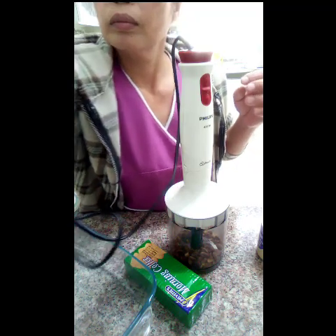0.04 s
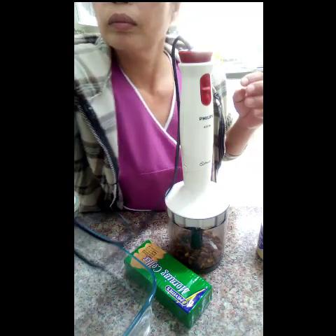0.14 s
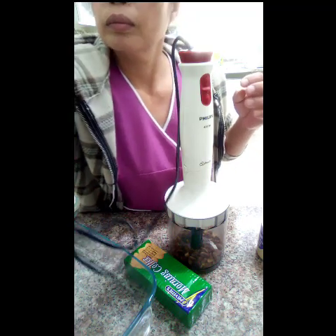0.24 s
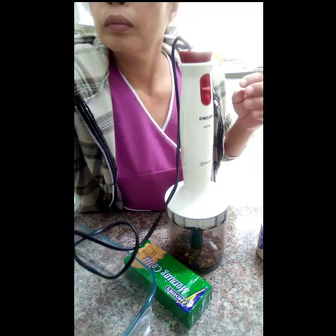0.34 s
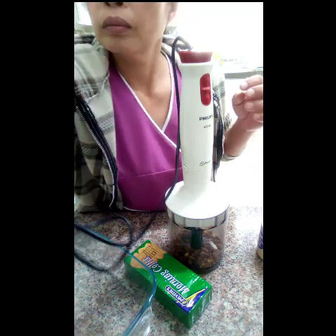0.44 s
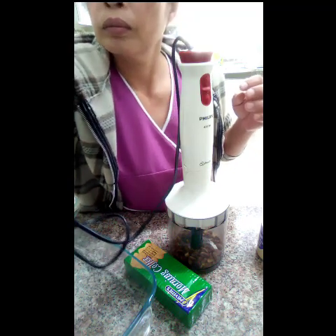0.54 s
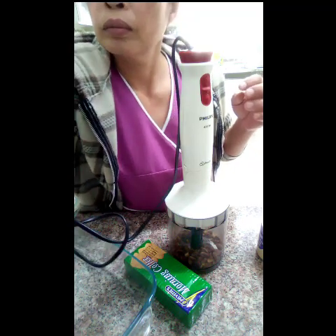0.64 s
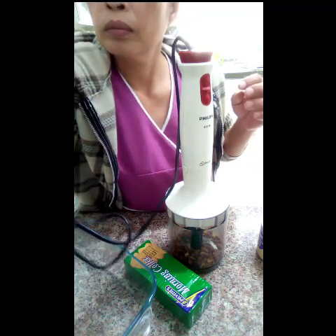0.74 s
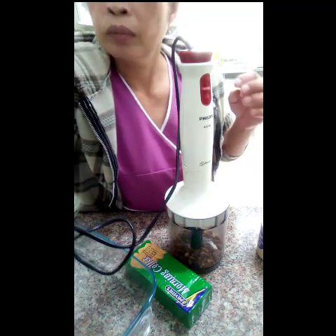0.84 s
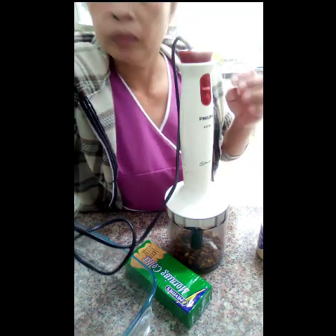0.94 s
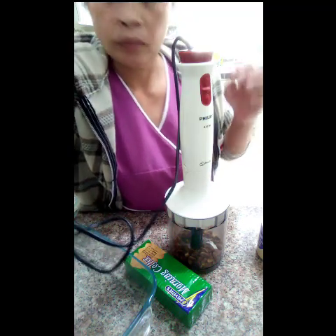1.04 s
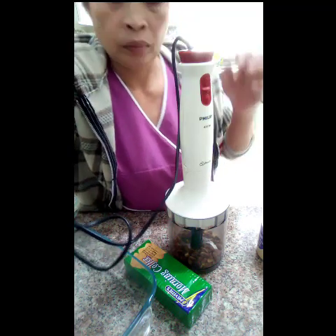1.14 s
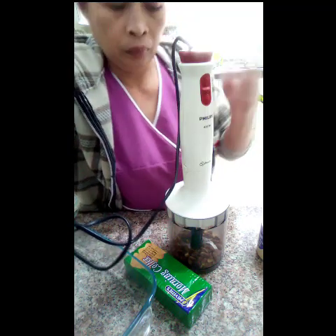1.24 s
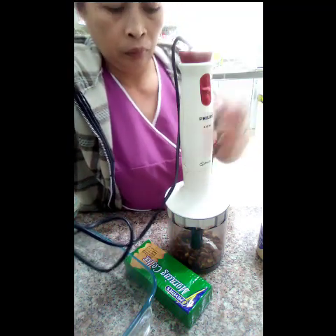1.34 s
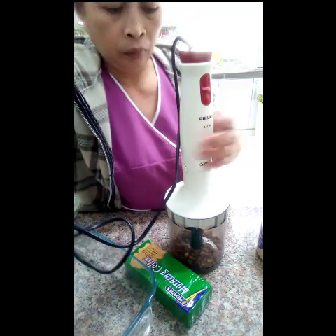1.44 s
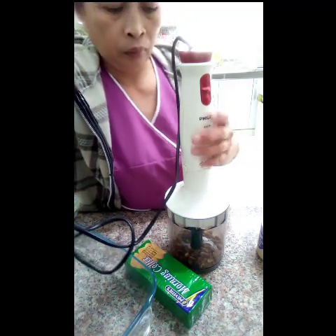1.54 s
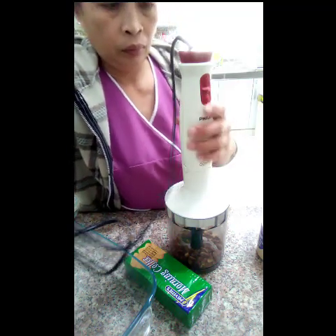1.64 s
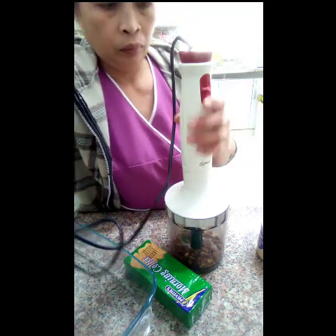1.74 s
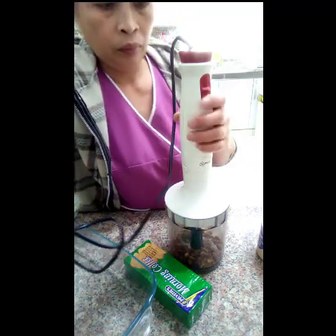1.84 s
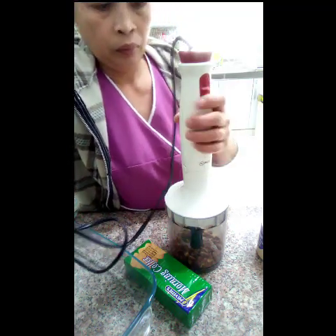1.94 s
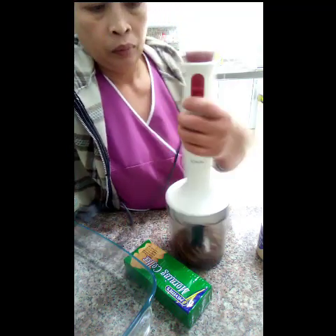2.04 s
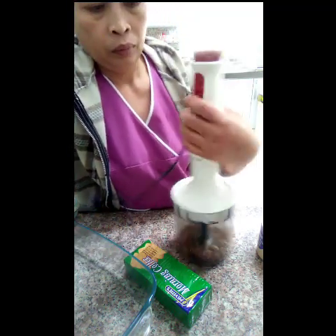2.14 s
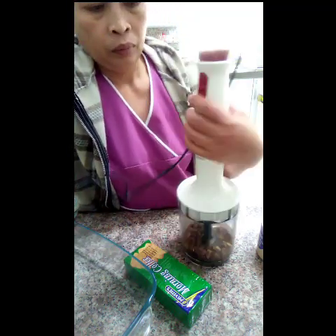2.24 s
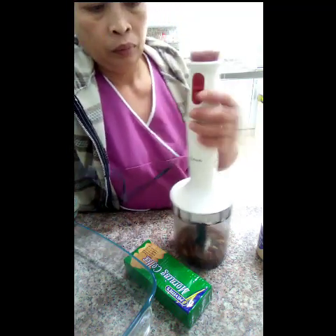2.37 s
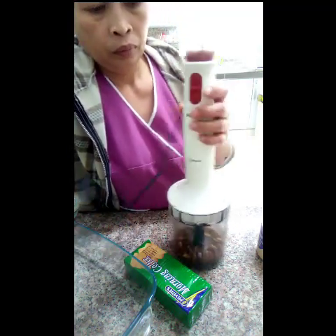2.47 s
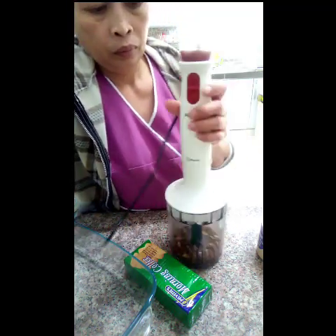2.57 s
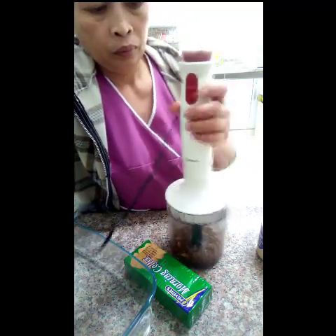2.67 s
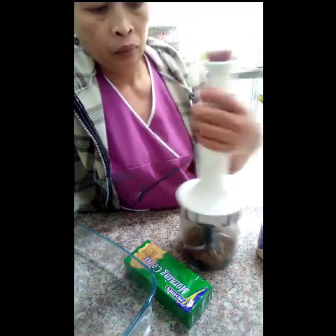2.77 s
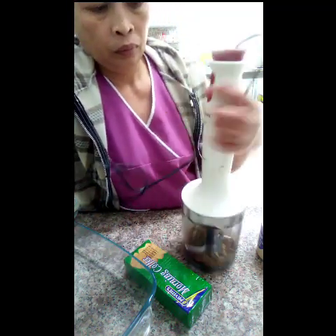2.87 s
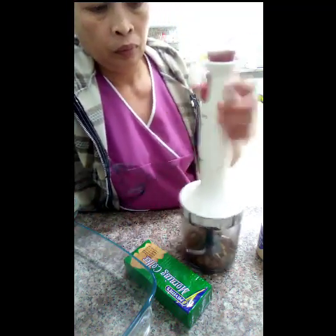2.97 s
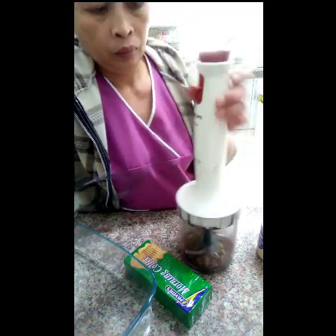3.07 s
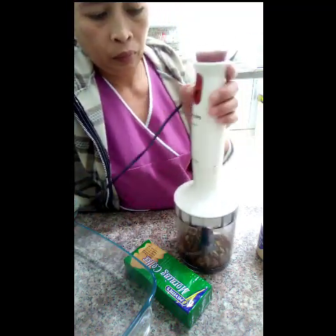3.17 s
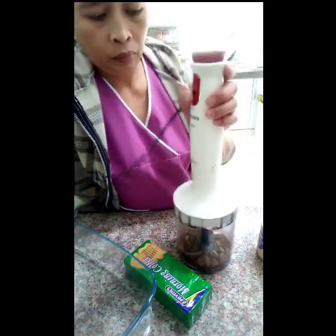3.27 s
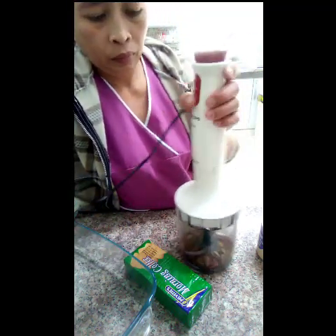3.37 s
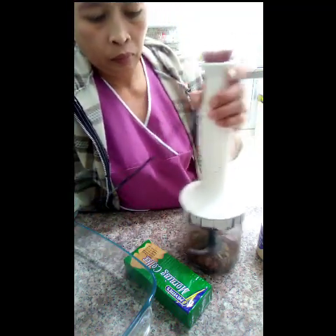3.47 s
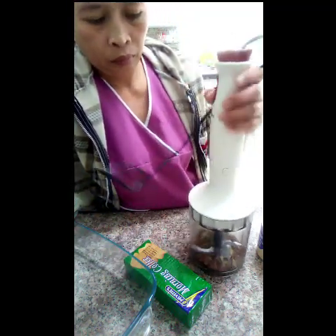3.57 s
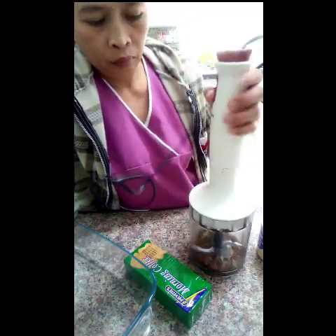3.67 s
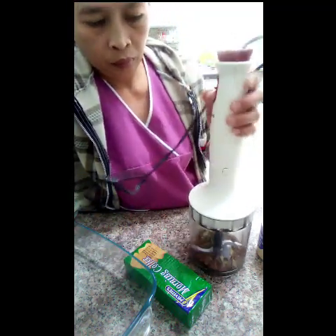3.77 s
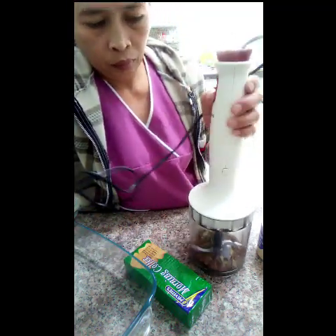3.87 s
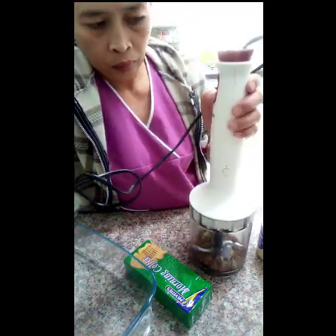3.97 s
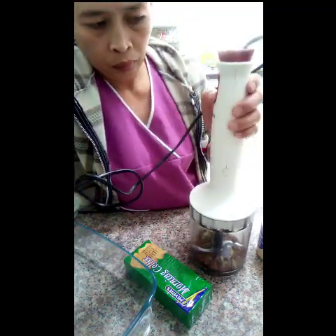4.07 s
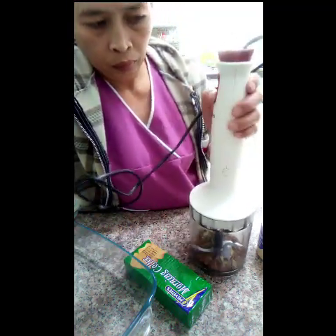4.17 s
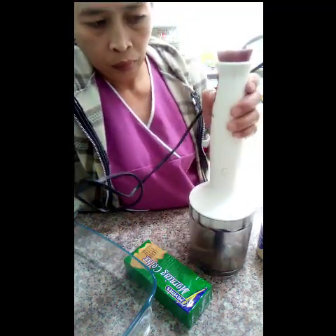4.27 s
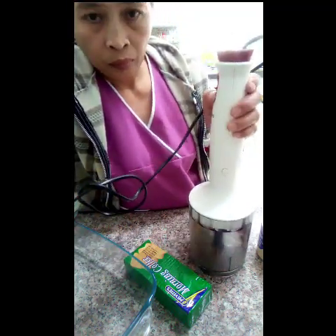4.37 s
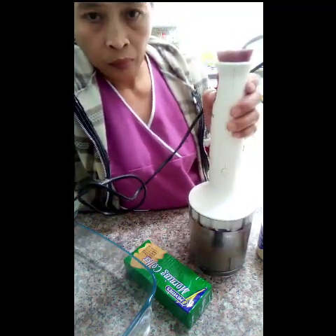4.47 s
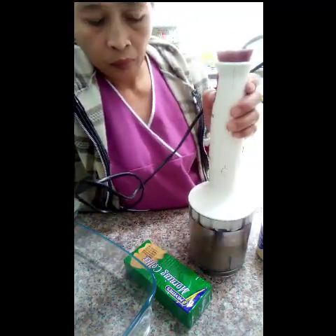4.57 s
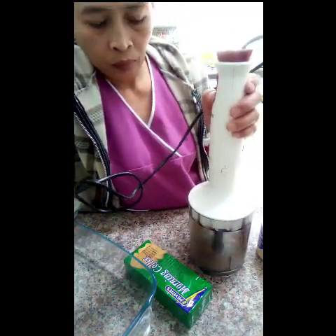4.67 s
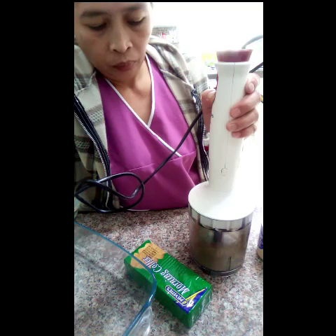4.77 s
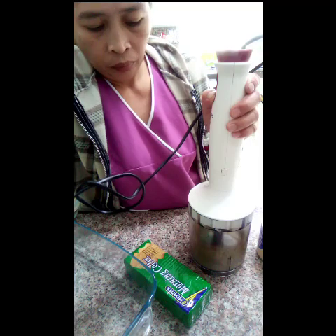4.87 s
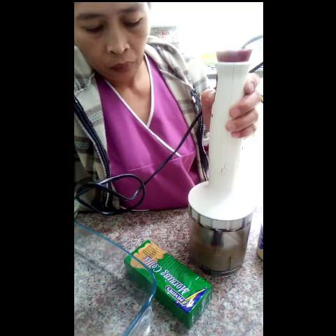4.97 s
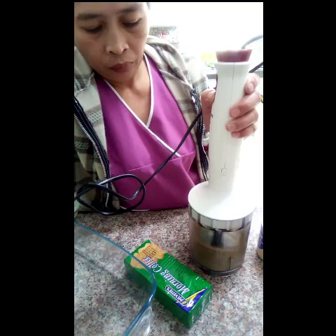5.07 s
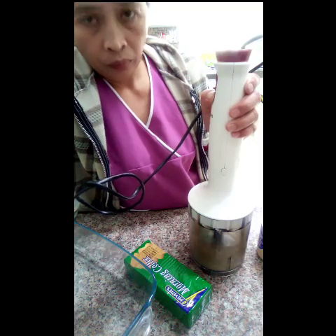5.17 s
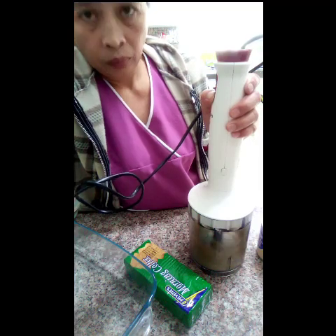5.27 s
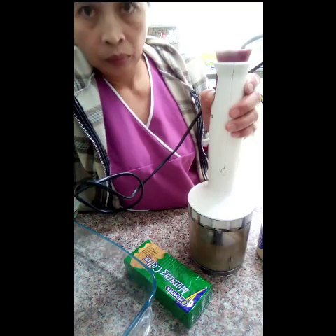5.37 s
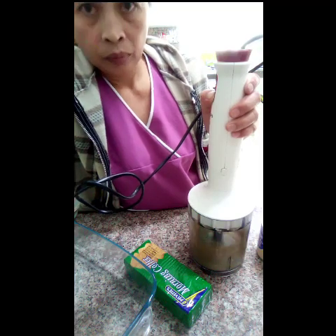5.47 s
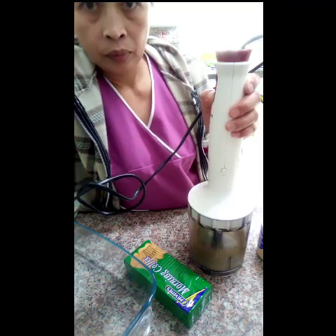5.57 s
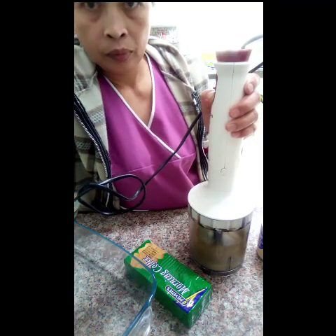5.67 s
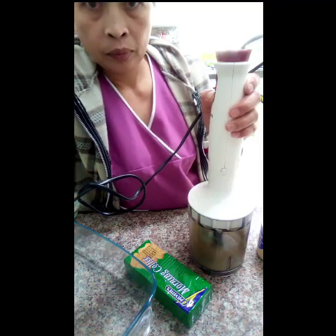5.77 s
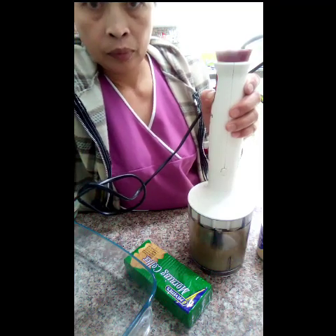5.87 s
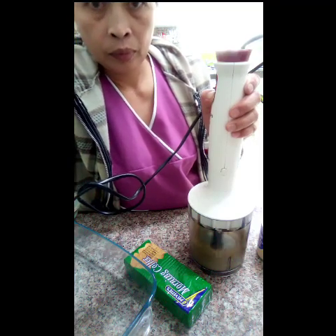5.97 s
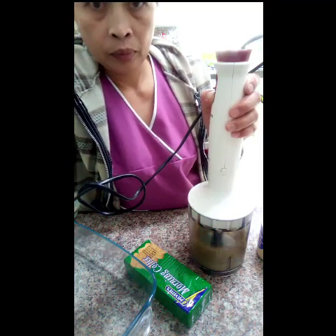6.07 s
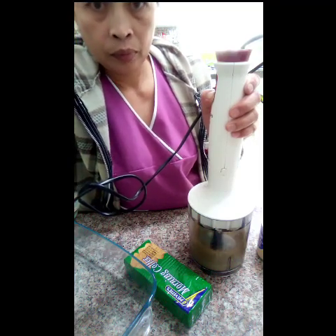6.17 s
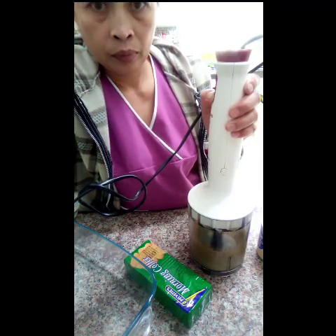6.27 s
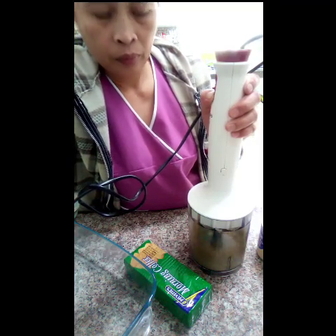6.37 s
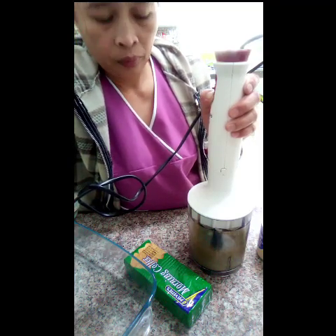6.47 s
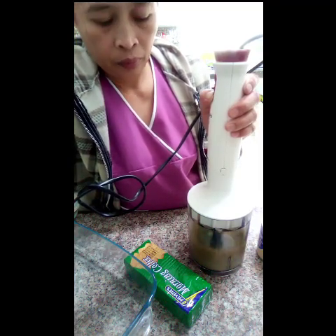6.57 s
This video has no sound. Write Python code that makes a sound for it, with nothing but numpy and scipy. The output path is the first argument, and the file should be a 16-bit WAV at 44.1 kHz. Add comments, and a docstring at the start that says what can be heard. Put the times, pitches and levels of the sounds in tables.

```python
"""A hand blender runs on a chopper bowl: its motor whines while the blade flings nuts against the bowl.
Random blows ring the plastic: hard pieces rattle first, then comes a finer, heavier churn.
Before it starts, a low hum, faint hiss and birds are heard, then a plastic snap, and a hand
knocks, rubs and slides the bowl; a button scrapes home and the bowl jolts as the motor starts.
Hard walls add an echo; gain control ducks the room under loud sounds."""
import sys
import numpy as np
from scipy import signal
from scipy.fft import rfft, irfft
from scipy.io import wavfile
from scipy.ndimage import uniform_filter1d

SR = 44100
rng = np.random.default_rng(int(sys.argv[2]) if len(sys.argv) > 2 else 0)


def wav_out(sig):
    """Save sig, one row per channel (or a flat mono array), as 16-bit PCM at SR to the path in sys.argv[1]."""
    wavfile.write(sys.argv[1], SR, np.round(np.clip(np.atleast_2d(sig).T, -1, 1) * 32767).astype(np.int16))


N = 291942
TIME = np.arange(N) / SR
# the motor starts, and the pieces reach full force this much later
START_S, SPIN_UP_S = 4.061, 0.039


def gain_of(db):
    """Decibels to amplitude."""
    return 10 ** (np.asarray(db) / 20)


def evened(x):
    """Scales to an rms (average strength) of 1."""
    return x / np.sqrt(np.mean(x ** 2) + 1e-20)


def read_colour(points, hz):
    """Reads a table of pitch and value at any pitch, on a log-frequency axis."""
    f, value = np.transpose(points)
    return np.interp(np.log1p(hz), np.log1p(f), value)


def curves(rows):
    """Draws straight lines through each column of a timed table, one value per sample."""
    s, *columns = np.transpose(rows)
    return [np.interp(TIME, s, column) for column in columns]


def add(mix, s, sound):
    """Mixes a sound in at time s."""
    part = mix[round(s * SR):][:len(sound)]
    part += sound[:len(part)]


def drift(rate_hz):
    """Slow random wandering of rms 1, fading out above the given rate."""
    hz = np.fft.rfftfreq(N, 1 / SR)
    spectrum = rfft(rng.standard_normal(N)) / (1 + (hz / rate_hz) ** 2)
    return evened(irfft(spectrum, N))


def swells(rows, width_s):
    """Brief smooth changes of level, in dB."""
    return sum(db * np.exp(-np.minimum(((TIME - s) / width_s) ** 2, 20)) for s, db in rows)


def shimmer(x, depth_db, span_hz, span_s):
    """Lifts and dips random patches of pitch and time, so the colour keeps shifting."""
    window, hop = 512, 128
    z = signal.stft(x, SR, nperseg=window, noverlap=window - hop)[2]
    patches = rng.standard_normal(z.shape)
    # smooth the patches across pitch, then across time
    for axis, steps in enumerate([span_hz * window / SR, span_s * SR / hop]):
        patches = signal.lfilter([1], [1, -np.exp(-1 / steps)], patches, axis=axis)
    z = z * gain_of(depth_db * evened(patches))
    shifted = signal.istft(z, SR, nperseg=window, noverlap=window - hop)[1][:N]
    return shifted * x.std() / shifted.std()


# Resonances of bowl, lid and housing, before the spot and ringing scale them: f/Hz, width/Hz, lift/dB
BOWL_RESONANCES = [(299, 18, 5), (461, 18, 8.5), (645.3, 33, 10.5), (724, 30, 9), (815, 104, 7.5),
                   (1149, 87, 4.5), (1420, 38, 7.5), (1790, 67, 7), (2020, 213, 9), (2125, 136, 6),
                   (3100, 490, 10.5), (3720, 57, 7.5), (3927, 157, 12.5), (4260, 140, 8.5),
                   (4687, 160, 8.5), (4540, 300, 1), (5308, 197, 6.5), (5840, 194, 5.5), (7310, 150, 5)]


def ring(colour, spot_db=0, ringing=1, size=8192):
    """Response of the plastic to one blow; the spot that is struck favours some resonances."""
    hz = np.fft.rfftfreq(size, 1 / SR)
    db = read_colour(colour, hz)
    for (f, width, lift), luck in zip(BOWL_RESONANCES, rng.standard_normal(len(BOWL_RESONANCES))):
        peak = 1 / (1 + (2 * (hz - f) / width) ** 2)
        db = db + ringing * (lift + spot_db * luck) * peak
    # minimum phase: the sound starts at the blow, never before it
    log_gain = np.log(gain_of(np.r_[db, db[-2:0:-1]]))
    spectrum = np.exp(np.conj(signal.hilbert(log_gain)))
    response = np.fft.ifft(spectrum).real[:size // 2]
    return response / np.linalg.norm(response)


def strike(blows, colour, spot_db=0, ringing=1):
    """A train of blows rings the plastic; ringing is how much of the bowl takes part."""
    return signal.oaconvolve(blows, ring(colour, spot_db, ringing))[:N]


def grains(per_s, spread_db):
    """Random impacts of uneven size, with a mean power near 1."""
    size = gain_of(spread_db * np.clip(rng.standard_normal(N), -2.3, 2.3))
    size = size / np.sqrt(uniform_filter1d(size ** 2, size=8000))
    sign = rng.choice([-1, 1], N)
    hit = rng.random(N) < per_s / SR
    return size * sign * hit * np.sqrt(SR / per_s)


def scaled_burst(chatter):
    """Gives a burst the energy of 10 ms at full level."""
    return chatter / np.linalg.norm(chatter) * np.sqrt(SR / 10 ** 2)


def scuff(length_s, size=3000):
    """One contact: a chatter that dies away at once."""
    return scaled_burst(rng.standard_normal(size) * np.exp(-np.arange(size) / SR / length_s))


def flurry(length_s, size=3000):
    """Chatter of one larger contact: a quick swell and fade."""
    age = np.arange(size) / SR / length_s
    return scaled_burst(rng.standard_normal(size) * age * np.exp(-age))


# Colour of the quiet kitchen's hiss: f/Hz, level/dB
AIR_COLOUR = [(25, -31), (100, 7), (200, -6.5), (380, -5), (520, -16.5), (640, -11.5), (820, -13.5),
              (1000, -3.5), (1250, -20), (1700, -29), (1950, -22.5), (2350, -31.5), (2650, -6), (3200, -18),
              (5300, -4), (6500, -12.5), (8000, -51), (14000, -36), (15000, -57)]


def background(air_db=-67.5, hum_hz=145.4, hum_db=-60.5, waver_db=1.35):
    """An appliance hums, pitch and level wavering, over faint, uneven filtered noise."""
    colour = gain_of(read_colour(AIR_COLOUR, np.fft.rfftfreq(N, 1 / SR)))
    air = irfft(rfft(rng.standard_normal(N)) * colour, N)
    air = shimmer(air, depth_db=2.9, span_hz=200, span_s=0.076)
    phase = 2 * np.pi * np.cumsum(hum_hz + 1.06 * drift(rate_hz=20.0)) / SR
    tone = np.sin(phase) + gain_of(-24.5) * np.sin(2 * phase)
    hum = tone * gain_of(waver_db * drift(rate_hz=29))
    return gain_of(air_db) * evened(air) + gain_of(hum_db) * evened(hum)


# Birds outside, pitch before the waver and level before the room:
# t/s, length/s, start f/Hz, end f/Hz, level/dB
BIRD_CALLS = [(.06, 0.11, 4480, 3720, -73.5), (.10, 0.044, 1405, 1520, -89), (0.927, 0.13, 4500, 3650, -71),
              (1.01, 0.026, 1440, 1480, -82), (2.728, 0.12, 4390, 3610, -71),
              (3.669, 0.073, 4950, 4240, -72), (3.672, 0.046, 1484, 1540, -87)]


def birds(waver=0.055):
    """Short slurs: sine tones that glide in pitch and waver, swelling and fading."""
    out = np.zeros(N)
    for s, length_s, start_hz, end_hz, db in BIRD_CALLS:
        hz = np.linspace(start_hz, end_hz, int(length_s * SR))
        wobble = evened(uniform_filter1d(rng.standard_normal(SR), size=90))[:len(hz)]
        hz = hz * (1 + waver * wobble)
        tone = np.sin(2 * np.pi * np.cumsum(hz) / SR)
        add(out, s, gain_of(db) * evened(tone * np.hanning(len(hz))))
    return out


# Time each pitch takes to die by 60 dB in the kitchen: f/Hz, decay/s
ROOM_DECAY = [(150, 0.22), (1000, 0.69), (4000, 0.63), (8000, 0.5), (15000, 0.18)]
# Strength of the echo's start, before it is scaled as a whole: f/Hz, level/dB
ECHO_COLOUR = [(150, -10), (600, -0.5), (1500, 4), (6000, -1), (10000, 2), (15000, -3)]


def kitchen(x):
    """Diffuse echo of hard walls, each band dying at its own speed; the air takes the highest treble."""
    # sparse random reflections, none in the first 6 ms
    taps = rng.standard_normal(SR) * (rng.random(SR) < .1) * (np.arange(SR) > .006 * SR)
    hz, t, z = signal.stft(taps, SR, nperseg=256)
    decay_s = read_colour(ROOM_DECAY, hz)[:, None]
    fade_db = read_colour(ECHO_COLOUR, hz)[:, None] - 60 * t / decay_s
    tail = signal.istft(z * gain_of(fade_db), SR)[1]
    return signal.oaconvolve(x, tail / np.linalg.norm(tail))[:N]


def stroke(start_s, length_s, rise_s=0.03, fall_s=0.038):
    """Pressure of one stroke: it swells, holds and dies away."""
    release = np.clip((TIME - start_s - length_s) / fall_s, 0, 20)
    return np.clip((TIME - start_s) / rise_s, 0, 1) * np.exp(-release)


# Knocks on the housing; the last column is how fast the scuff dies:
# t/s, thud level/dB, clack level/dB, tick level/dB, decay/s
KNOCK_TIMES = [(.474, -92, -60, -68, 0.0057), (1.858, -70, -58.5, -67, 0.018),
               (1.998, -78, -92, -56, 0.0047), (2.159, -48.5, -71, -48, 0.027),
               (2.524, -69, -58, -70, 0.052), (2.576, -69, -51.5, -59, 0.0045),
               (2.628, -54, -75, -50.5, 0.013), (2.777, -54, -62, -80, 0.008),
               (3.165, -80, -70, -50, 0.036), (3.317, -66, -83, -57, 0.0054)]
# Colour of the thud: f/Hz, level/dB
THUD_COLOUR = [(40, -14), (110, 10), (220, 7.5), (600, -11.5), (850, -2), (1300, -24), (4000, -77)]
# Colour of the clack, also part of the button's scrape: f/Hz, level/dB
CLACK_COLOUR = [(300, -5), (1300, -24), (2100, -13.5), (3100, -8), (4000, -12.5), (6000, -3), (9000, -39),
                (15000, -21)]
# Colour of dry skin sliding on the housing, and of the ticks: f/Hz, level/dB
PALM_COLOUR = [(200, -26), (1600, -21), (2100, -40), (3300, -27.5), (4700, -9.5), (5500, 4.5), (6400, 1.5),
               (7200, -8), (8200, -21.5), (13500, -26.5), (15000, -4.5)]
# Colour of the bowl sliding on stone: f/Hz, level/dB
SLIDE_COLOUR = [(100, -24), (280, -3), (520, -19.5), (880, -6.5), (1150, -12), (1600, -27.5), (2800, -17.5),
                (5000, -16), (9000, -45)]
# Strokes of the hand as it takes hold, before the rub and slide trims:
# t/s, length/s, palm on housing level/dB, bowl on counter level/dB
HAND_STROKES = [(1.745, 0.22, -58.5, -81), (1.952, 0.076, -56, -76), (2.201, 0.076, -58.5, -68),
                (2.332, 0.064, -59.5, -70.5), (2.479, .06, -56.5, -62.5), (2.598, 0.14, -67, -69),
                (2.784, 0.2, -67.5, -68.5), (3.174, 0.13, -56.5, -73), (3.335, 0.13, -75, -72),
                (3.607, .1, -67, -95)]


def handling(resting_db=-72.5, grip_s=3.35, rub_db=-1, slide_db=-1, catch_db=1.83, ringing=0.87):
    """Knocks on the housing, the palm's uneven rub and the bowl's slide; the hand damps the plastic."""
    thuds, clacks, ticks = blows = np.zeros((3, N))
    for s, *levels, decay_s in KNOCK_TIMES:
        for train, db in zip(blows, levels):
            add(train, s, gain_of(db) * scuff(decay_s))
    # the loose hand barely rubs between strokes, until the grip is firm
    loose = (TIME > HAND_STROKES[0][0]) * (TIME < grip_s)
    palm, bowl = gain_of(resting_db) * loose, np.zeros(N)
    for s, length_s, palm_db, bowl_db in HAND_STROKES:
        pressure = stroke(s, length_s)
        palm = palm + gain_of(palm_db) * pressure
        bowl = bowl + gain_of(bowl_db) * pressure
    # skin and plastic catch and slip many times a second
    catching = gain_of(catch_db * drift(rate_hz=17))
    rub = catching * palm * gain_of(rub_db) * grains(per_s=2200, spread_db=0.5)
    slide = catching * bowl * gain_of(slide_db) * grains(per_s=920, spread_db=3)
    contacts = [(thuds, THUD_COLOUR), (clacks, CLACK_COLOUR),
                (ticks + rub, PALM_COLOUR), (slide, SLIDE_COLOUR)]
    sound = sum(strike(train, colour, ringing=ringing) for train, colour in contacts)
    return shimmer(sound, depth_db=3.0, span_hz=382, span_s=0.032)


# A plastic catch gives way and snaps home: t/s, level/dB, decay/s
SNAP_CONTACTS = [(0.5846, -45, 0.003), (0.5887, -25.5, 0.00086), (0.5892, -27.5, 0.0065),
                 (.5921, -29, 0.0019)]
# Colour of the snap: f/Hz, level/dB
SNAP_SPECTRUM = [(100, -13), (330, -22.5), (520, -9), (720, -15.5), (1150, -32.5), (2100, -4.5),
                 (2450, -13), (3800, -1), (4600, -9), (5400, 4.5), (6400, -2.5), (8200, -19.5),
                 (13500, -28), (15200, -7.5)]


def snap():
    """A few contacts within ten milliseconds, too stiff to ring."""
    blows = np.zeros(N)
    for s, db, decay_s in SNAP_CONTACTS:
        add(blows, s, gain_of(db) * scuff(decay_s))
    return strike(blows, SNAP_SPECTRUM, ringing=0)


# Colour of a piece striking the wall, also part of the button's scrape: f/Hz, level/dB
RATTLE_COLOUR = [(100, -50), (600, -24), (1600, -30), (2600, -27.5), (3500, -23.5), (4900, -11), (5700, -1),
                 (6600, -5.5), (7400, -16), (8200, -25), (12000, -29), (13800, -30.5), (14600, -12),
                 (15800, -22.5)]


def switch(press_s=4.038, press_db=-53):
    """The button scrapes home in small random contacts just before the motor catches."""
    # only a faint trace before the press, silent once the blade is up to speed
    pressing = np.interp(TIME, [press_s, press_s + 0.0026, START_S, START_S + SPIN_UP_S],
                         [0.018, 0.98, 1, 0])
    scrape = strike(grains(2400, 4.3), RATTLE_COLOUR) + .5 * strike(grains(3000, 3), CLACK_COLOUR)
    return pressing * gain_of(press_db) * scrape


def motor(whine_hz=6050, whine_db=-39, run_up_s=0.015, waver=0.00091):
    """A thin whine: one sine that climbs to speed and wavers in pitch and level."""
    speed = 1 - np.exp(-np.maximum(TIME - START_S, 0) / run_up_s)
    hz = whine_hz * speed * (1 + waver * drift(rate_hz=36))
    level = speed * gain_of(whine_db + 1 * drift(rate_hz=9.1))
    return level * np.sin(2 * np.pi * np.cumsum(hz) / SR)


def strays(count=40, per_s=11, level_db=-20, spread_db=2.5):
    """Rows (t/s, level/dB) of lesser pieces, at uneven intervals once the blade is up to speed."""
    gaps, sizes = rng.uniform(0, 2, count), rng.standard_normal(count)
    times = START_S + SPIN_UP_S + np.cumsum(gaps) / per_s
    return list(zip(times, level_db + spread_db * sizes))


# How far the nuts are broken down: t/s, pieces hitting the wall/per s, spread of their sizes/dB
BREAKDOWN = [(4.06, 1580, 2), (5.0, 2120, 4.5), (6.62, 3800, -0.5)]
# The blade bites into the heap, flings it clear, bites again and settles;
# rattle of hard pieces before lulls, clumps and trims: t/s, level/dB
RATTLE_LEVEL = [(4.1, -20.5), (4.17, -31.5), (4.24, -30), (4.31, -25.5), (4.4, -29.5), (6.62, -29)]
# Moments when the blade finds few pieces: t/s, level change of the rattle/dB
FEW_PIECES = [(4.17, -14), (4.387, -6), (4.606, -1), (4.934, -4.5), (4.963, -8.5), (5.087, -3), (5.603, -5),
              (5.822, 0), (5.928, -11.5)]
# The largest pieces batted against the wall, before the trim: t/s, level/dB
LARGE_PIECES = [(4.259, -9.5), (4.291, -11), (4.3202, -14), (4.3452, -3.5), (4.45, -15), (4.625, -12.5),
                (4.7073, -11.5), (4.7337, -15), (4.8022, -10.5), (4.942, -13), (4.976, -18), (5.0598, -13),
                (5.141, -14), (5.2259, -12.5), (5.2794, -13.5), (5.349, -9), (5.408, -14), (5.452, -11.5),
                (5.485, -15), (5.5874, -13), (5.738, -17)]
# A large piece drives mostly the wall's main resonance: f/Hz, level/dB
WALL_COLOUR = [(200, -28), (3000, -32), (4600, -13.5), (5400, -1), (6000, 3), (7000, -12.5), (8300, -25.5),
               (13500, -42), (14800, -21)]
# Brief moments when the churn swells: t/s, lift level/dB
CHURN_SWELLS = [(4.43, 4), (4.66, 3.5), (4.89, 5), (5.02, 2), (5.48, 2.5), (5.67, 4.5), (6.13, 6),
                (6.34, 5), (6.52, 3.5)]
# Colour of the churning meal: f/Hz, level/dB
CHURN_COLOUR = [(30, -48), (70, -19.5), (120, -8), (250, -2), (410, -3.5), (550, -12), (760, -0.5),
                (1000, -1.5), (1320, -10), (2000, -14.5), (3000, -12.5), (8000, -44.5)]


def chopper(drive_db=5.0, dust_db=2, churn_start_db=-48, churn_db_per_s=2.5, churn_db=8, chunk_db=-4,
            clump_db=2.5, slosh_db=0.07, lull_s=0.015, swell_s=0.028, count=5):
    """Pieces hit the wall at several spots in clumps, dust sprays it, and the meal tumbles round the bowl."""
    rattle_level, = curves(RATTLE_LEVEL)
    # the churn grows steadily as meal builds up
    growth = churn_start_db + churn_db_per_s * (TIME - START_S)
    churn_level = growth + swells(CHURN_SWELLS, swell_s)
    per_s, spread_db = curves(BREAKDOWN)
    running = np.clip((TIME - START_S) / SPIN_UP_S, 0, 1)
    clumps = drift(rate_hz=45)
    lulls = swells(FEW_PIECES, lull_s)
    force = running * gain_of(rattle_level + lulls + clump_db * clumps)
    dust = gain_of(dust_db) * force * rng.standard_normal(N)
    rattle = strike(dust, RATTLE_COLOUR)
    for spot in range(count):
        blows = gain_of(drive_db) * force * grains(per_s / count, spread_db) / np.sqrt(count)
        rattle += strike(blows, RATTLE_COLOUR, spot_db=2.0)
    large = np.zeros(N)
    for s, db in LARGE_PIECES + strays():
        add(large, s, gain_of(db + chunk_db) * flurry(length_s=0.0025))
    # the soft meal follows the clumps only loosely
    slosh = slosh_db * drift(rate_hz=23)
    tumble = running * gain_of(churn_level + churn_db + slosh + 0.56 * clumps + 0.85 * lulls)
    churn = strike(tumble * grains(per_s=1000, spread_db=2.5), CHURN_COLOUR)
    sound = rattle + strike(large, WALL_COLOUR, ringing=0.63) + churn
    return shimmer(sound, depth_db=2.0, span_hz=166, span_s=0.012)


# Colour of the starting jolt: f/Hz, level/dB
JOLT_COLOUR = [(50, -34), (110, -8), (200, -3), (450, -2.5), (750, 3), (1100, -10.5), (2100, -11.5),
               (4000, -39)]


def kick(at_s=4.064, kick_db=-29):
    """The starting torque jolts the bowl against the counter: one low burst."""
    blows = np.zeros(N)
    add(blows, at_s, gain_of(kick_db) * flurry(length_s=0.0037))
    return strike(blows, JOLT_COLOUR, ringing=0.46)


def scene(room_db=-16, snap_room_db=-22, bird_direct_db=-2):
    """The blender is close; the birds arrive largely as echo."""
    near = chopper() + motor() + kick() + switch() + handling()
    catch, far = snap(), birds()
    echo = kitchen(gain_of(room_db) * near + gain_of(snap_room_db) * catch + far)
    return (near + catch + gain_of(bird_direct_db) * far + echo + background())[None]


def record(dry, threshold_db=-40, squeeze=0.47, recovery_db_per_s=450, edge_hz=15800):
    """Fast gain control holds loud sounds down; then a filter removes the highest treble."""
    power_db = 10 * np.log10(abs(uniform_filter1d(dry[0] ** 2, size=300)) + 1e-12)
    # the held level jumps up with each peak and sinks steadily after it
    fall = TIME * recovery_db_per_s
    held_db = np.maximum.accumulate(power_db + fall) - fall
    over_db = np.maximum(held_db - threshold_db, 0)
    ducked = dry / gain_of(np.clip(squeeze, 0, 1) * uniform_filter1d(over_db, size=100))
    low_pass = signal.firwin(801, edge_hz, window=("kaiser", 9), fs=SR)
    return signal.oaconvolve(ducked, low_pass[None], "same")


dry = scene()
out = record(dry)
wav_out(out)
```